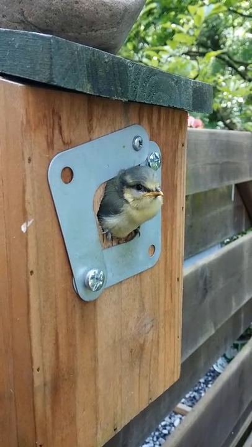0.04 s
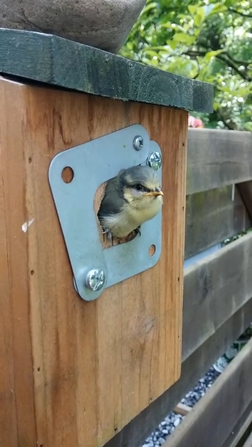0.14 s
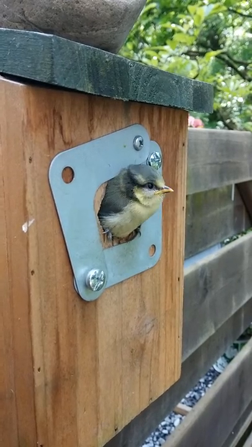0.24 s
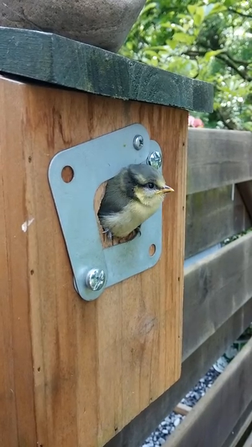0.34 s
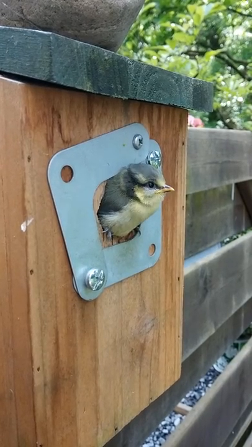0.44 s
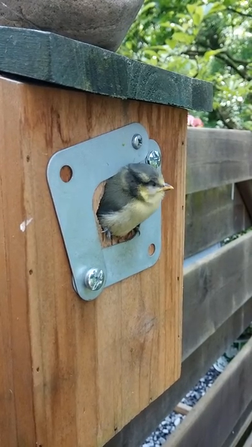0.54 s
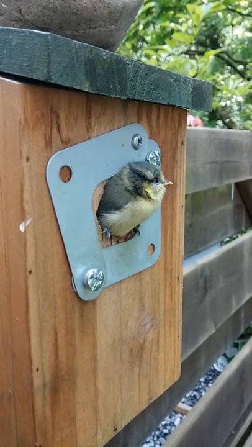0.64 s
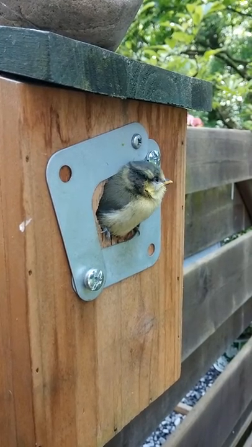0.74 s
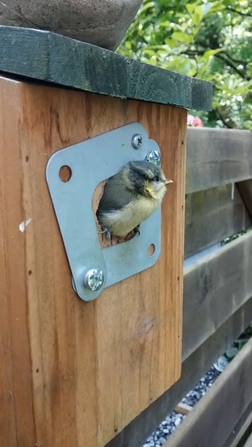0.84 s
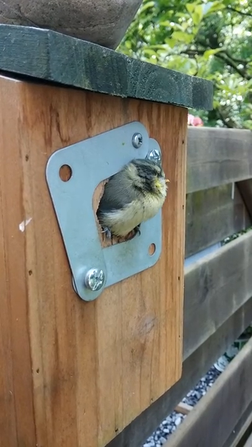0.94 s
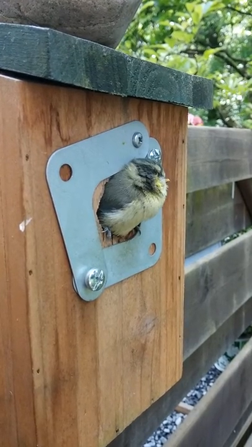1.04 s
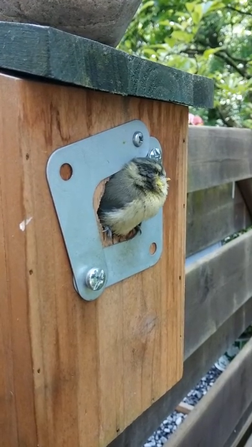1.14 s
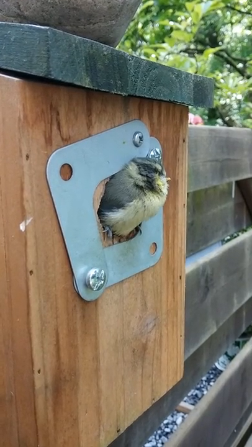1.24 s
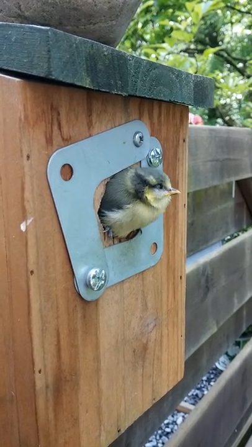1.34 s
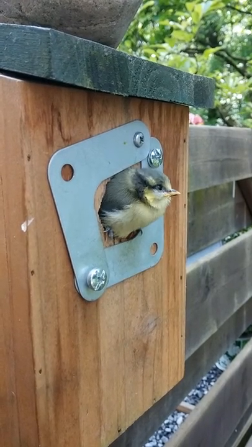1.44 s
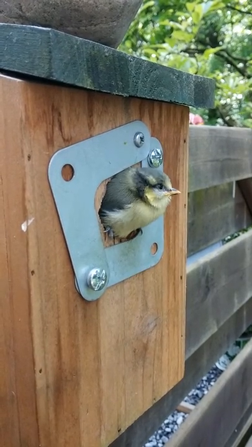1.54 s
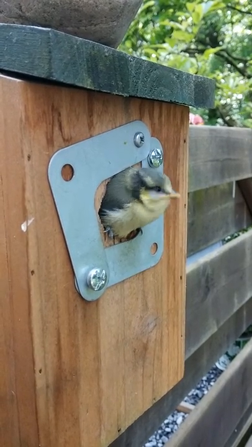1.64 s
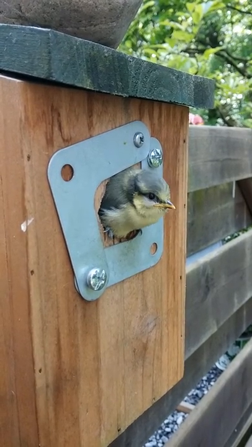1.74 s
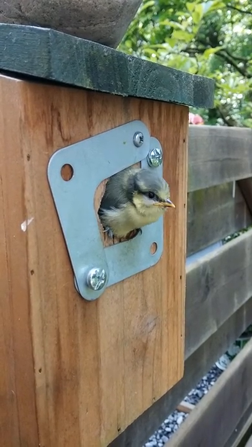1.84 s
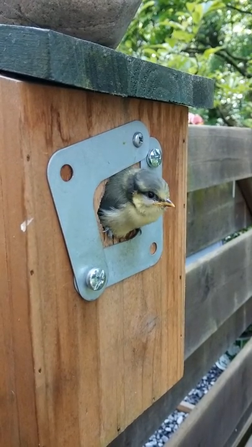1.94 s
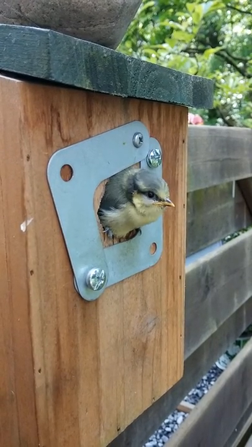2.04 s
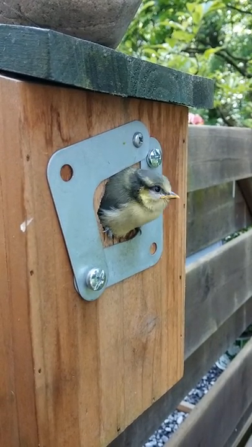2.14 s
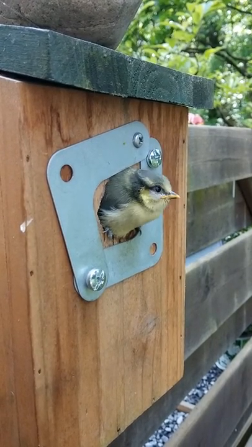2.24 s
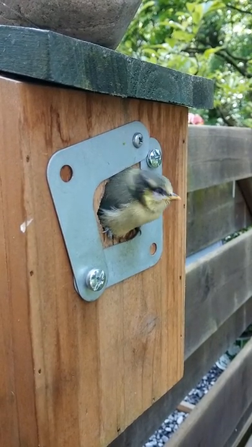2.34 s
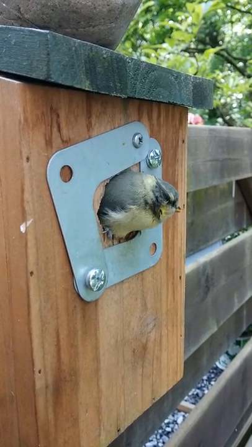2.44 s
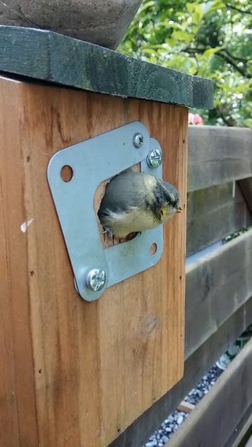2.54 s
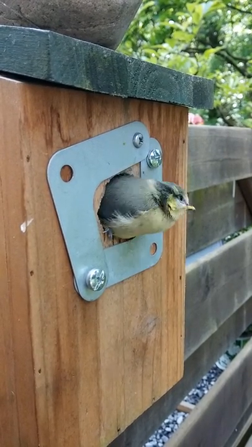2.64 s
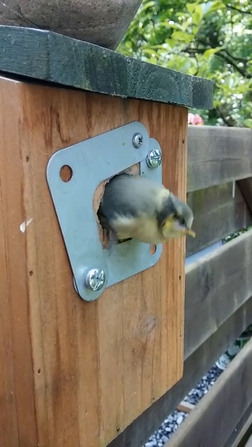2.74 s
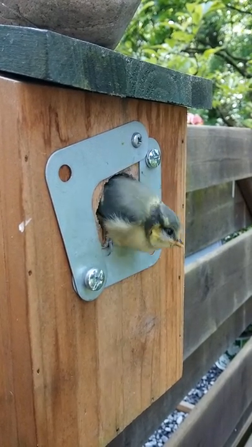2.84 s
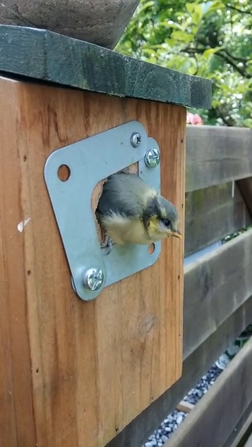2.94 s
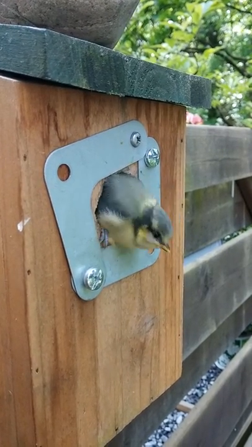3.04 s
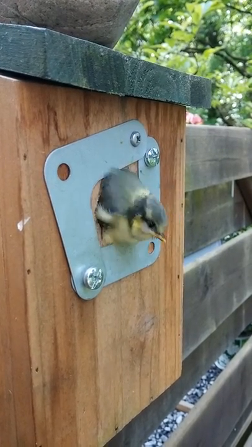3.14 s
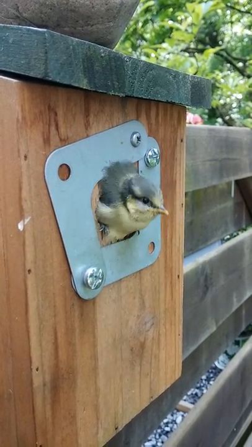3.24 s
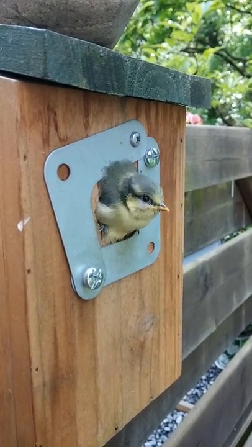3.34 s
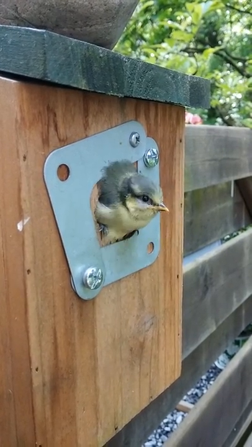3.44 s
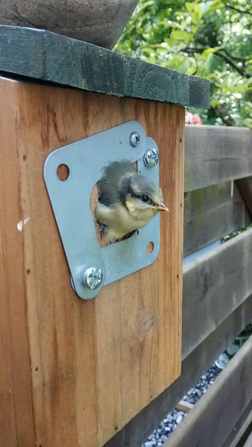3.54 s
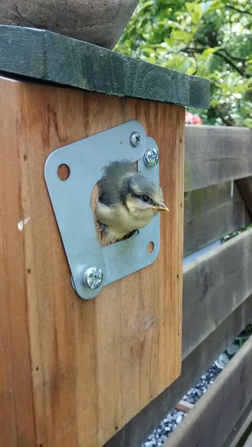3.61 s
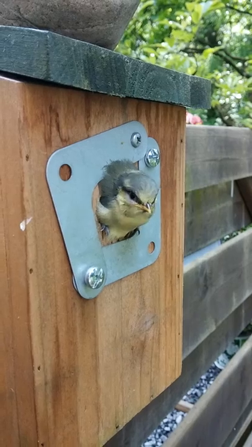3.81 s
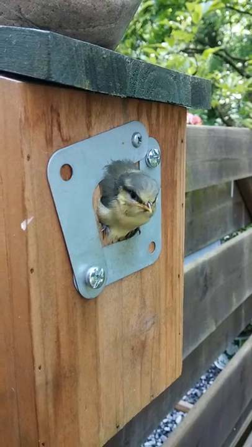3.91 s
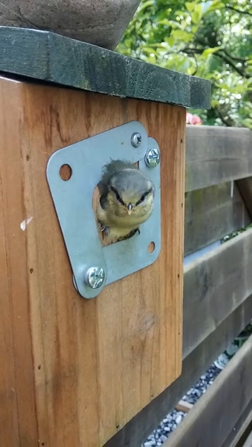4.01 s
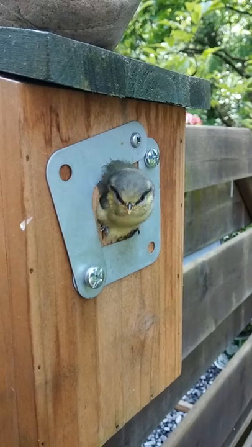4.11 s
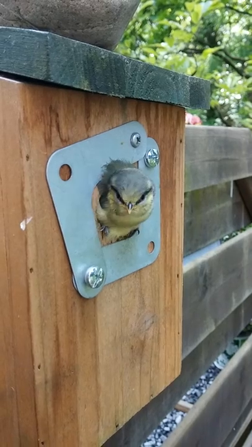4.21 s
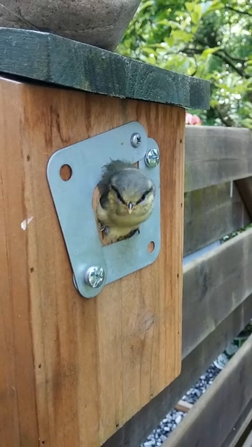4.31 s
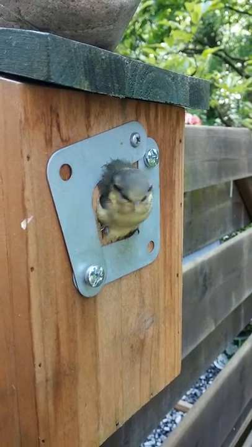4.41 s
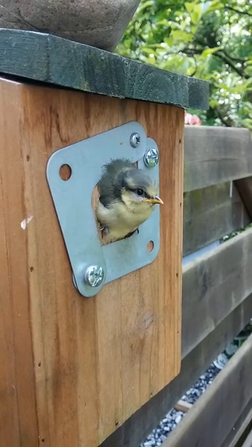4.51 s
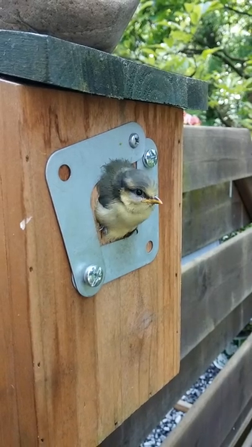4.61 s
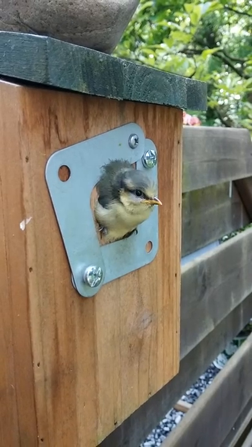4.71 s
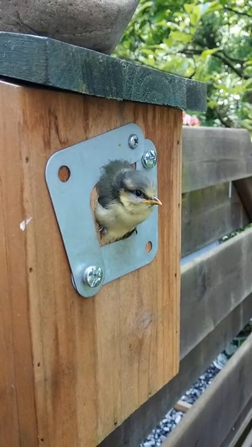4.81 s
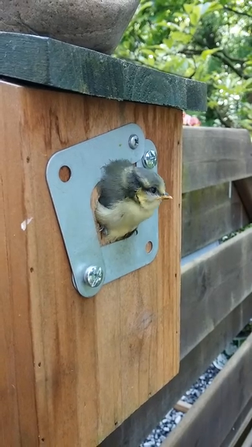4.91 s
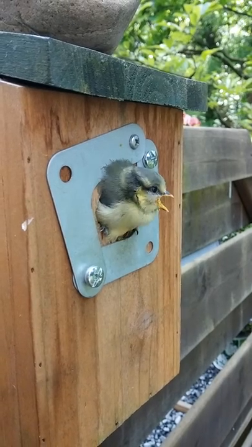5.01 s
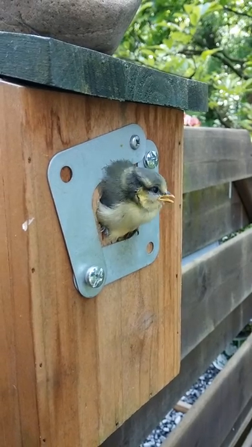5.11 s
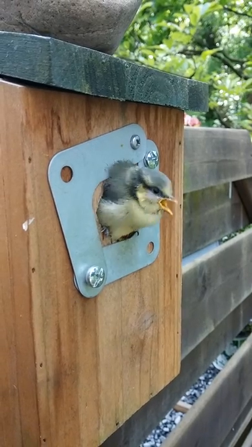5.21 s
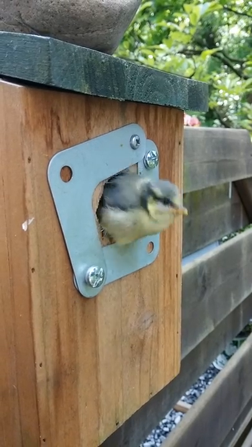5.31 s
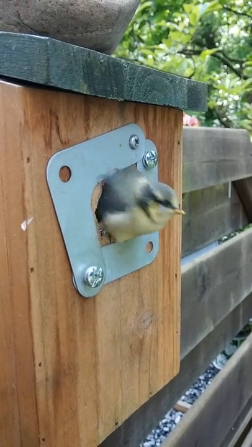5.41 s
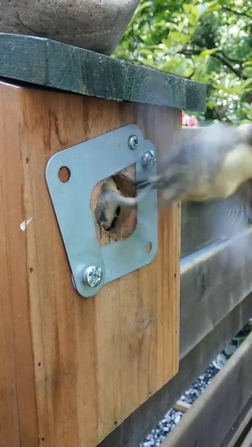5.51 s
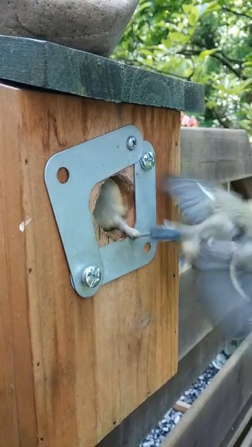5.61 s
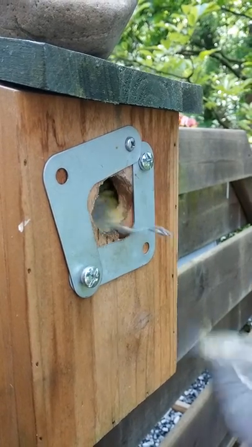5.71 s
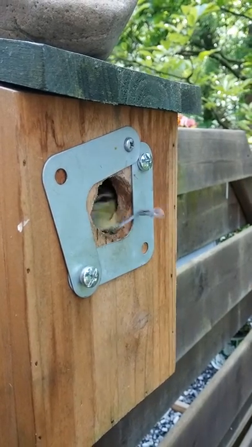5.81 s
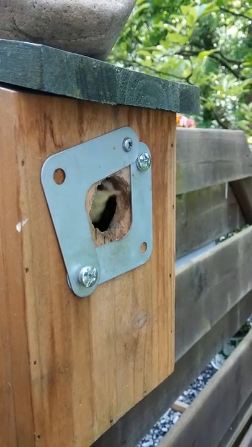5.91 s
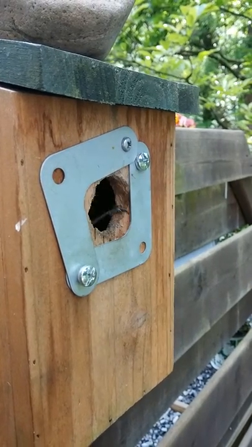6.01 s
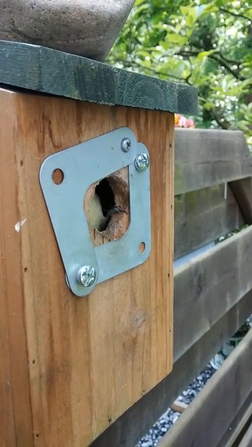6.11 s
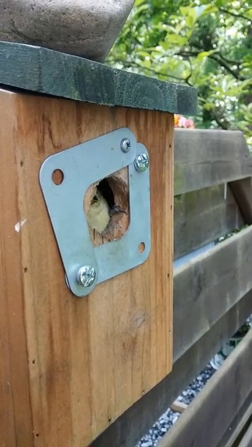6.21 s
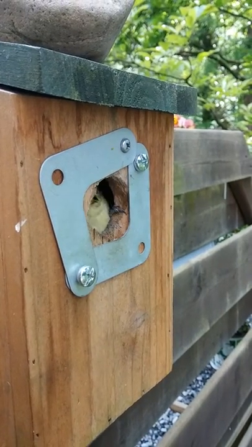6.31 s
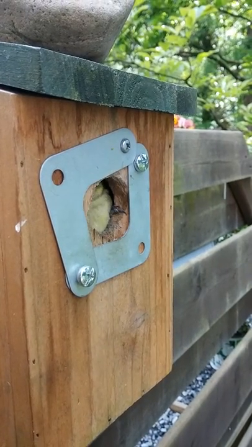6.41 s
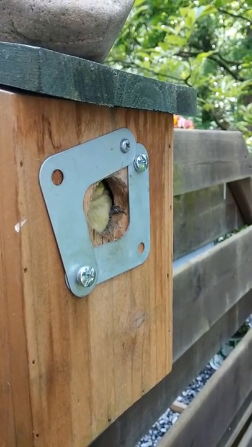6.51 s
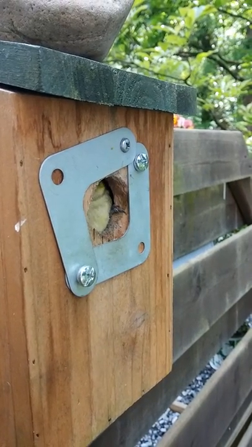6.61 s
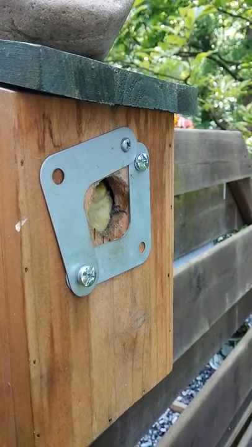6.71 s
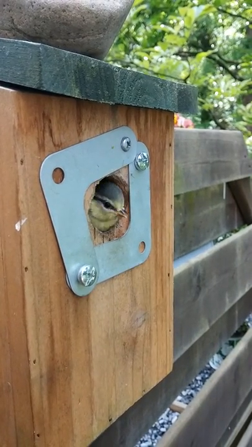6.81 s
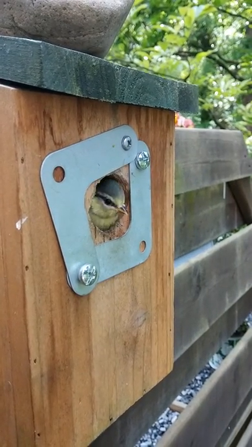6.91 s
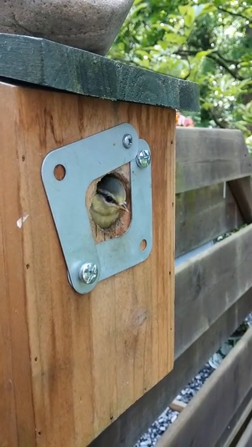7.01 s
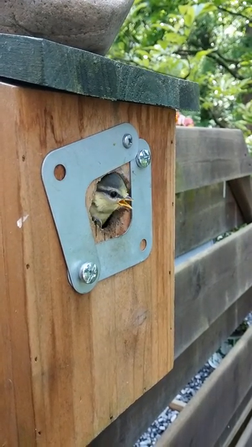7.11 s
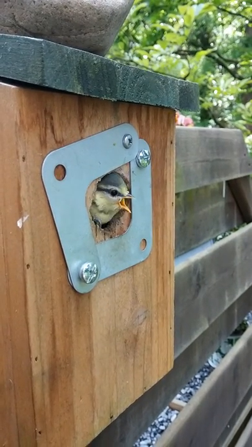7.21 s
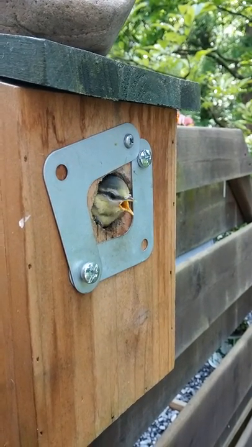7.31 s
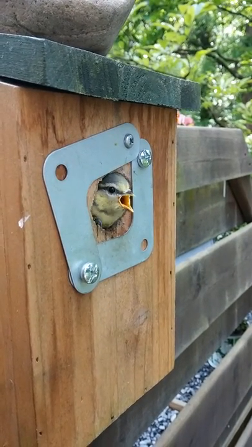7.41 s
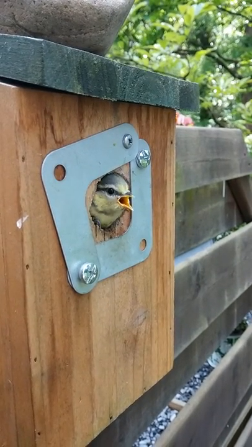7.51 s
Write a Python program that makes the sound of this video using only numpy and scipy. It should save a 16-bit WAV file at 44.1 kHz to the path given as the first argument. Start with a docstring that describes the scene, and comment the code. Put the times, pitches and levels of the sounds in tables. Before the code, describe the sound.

Soft thrush-like whistling over low traffic rumble, two shrill chick calls up close, a burst of flapping and scratching, then three more high calls.

```python
"""Young tits at a nest box

A young tit begs twice at the hole, its paired voices modulating each other, then scrambles out and flutters off.
Noise bursts make its wings, ticks and thumps its claws; a second bird takes its place and begs in three calls.
Other young and thrush-like whistles, gliding tones with echoes, ring over noise-made traffic rumble and air.
The background dips briefly, later drops out between calls; high notes carry a faint mirror image about 8 kHz."""
import sys
import numpy as np
from scipy import signal
from scipy.fft import rfft, irfft, next_fast_len
from scipy.io import wavfile
from scipy.ndimage import uniform_filter1d, minimum_filter1d, map_coordinates

SR = 44100
rng = np.random.default_rng(int(sys.argv[2]) if len(sys.argv) > 2 else 0)


def materialize(psi):
    """Save the field psi as 16-bit PCM at rate SR to the path in sys.argv[1].

    A 1-D psi becomes a single channel; in a 2-D psi each row is a channel.
    """
    bounded = np.clip(np.atleast_2d(psi).T, -1, 1)
    quanta = np.round(bounded * 32767).astype(np.int16)
    wavfile.write(sys.argv[1], SR, quanta)


N = 332955
T = np.arange(N) / SR
RIGHT = np.array([[0], [1]])  # picks the right channel


def amp(db):
    """Decibels to linear gain."""
    return 10 ** (np.asarray(db) / 20)


def unit(x):
    """Scale to an RMS of one."""
    return x / np.sqrt(np.mean(x ** 2) + 1e-20)


def along(points, hz):
    """Read (frequency, value) points on a log frequency axis."""
    f, v = np.transpose(points)
    return np.interp(np.log(hz + 1), np.log(f + 1), v)


def over_time(points):
    """Read (time, value) points as a curve over the scene."""
    return np.interp(T, *np.transpose(points))


def wobble(rate):
    """A smooth random curve, rate knots a second."""
    knots = rng.standard_normal(int(N * rate / SR) + 4)
    return map_coordinates(knots, [T * rate])


def filtered(x, response):
    """Shape the spectrum of x by a response of frequency."""
    m = next_fast_len(N + 8192)
    spectrum = rfft(x, m) * response(np.fft.rfftfreq(m, 1 / SR))
    return irfft(spectrum, m)[..., :N]


def noise(colour, alike):
    """Stereo noise: mid and side shares set how alike left and right are at each frequency."""
    def mid_side(hz):
        turn = np.arccos(np.clip(along(alike, hz), -1, 1)) / 2
        return amp(along(colour, hz)) * [np.cos(turn), np.sin(turn)]
    mid, side = filtered(rng.standard_normal((2, N)), mid_side)
    return unit(np.array([mid + side, mid - side]))


def stirred(x, rate, share):
    """Moving leaves and air blur a tone: part of it gets a random gain."""
    return x * (np.sqrt(1 - share) + np.sqrt(share) * unit(wobble(rate)))


def patchy(x, depth_db):
    """Random gain in patches of time and frequency."""
    z = signal.stft(x, nperseg=512)[2]
    field = uniform_filter1d(rng.standard_normal(z.shape[1:]), 5, 0)
    field = uniform_filter1d(field, 8, 1)
    return signal.istft(z * amp(depth_db * unit(field)), nperseg=512)[1][:, :N]


def note(rows, fade):
    """Sample span, edge fade and smoothed per-sample columns of one note."""
    s, *cols = np.transpose(rows)
    first = max(int((s[0] - fade) * SR), 0)
    span = slice(first, min(int((s[-1] + fade) * SR), N))
    t = T[span]
    edge = np.clip(np.minimum(t - s[0], s[-1] - t) / fade + 1, 0, 1) ** 2
    return span, edge, [uniform_filter1d(np.interp(t, s, c), size=257) for c in cols]


# Fences and trees: (frequency [Hz], time to fall 60 dB before each sound's own scale [s])
REFLECTIONS = [(2000, 0.55), (5000, 0.33), (9000, 0.35)]


def echoes(x, scale):
    """Scattered returns; each frequency dies at its own speed."""
    hz, t, z = signal.stft(rng.standard_normal((2, SR // 2)), SR, nperseg=256)
    decay = amp(-60 * t / (scale * along(REFLECTIONS, hz))[:, None])
    tail = signal.istft(z * decay, SR, nperseg=256)[1]
    delayed = np.pad(x, (300, 0))[None]
    return signal.fftconvolve(delayed, tail / np.linalg.norm(tail[0]), axes=1)[:, :N]


# Hiss of the microphone: (frequency [Hz], relative level [dB per Hz])
MIC_HISS = [(30, 8), (300, 0), (2000, -24.5), (9000, -20.5), (16000, -22.5)]


def self_noise():
    """A steady stereo noise floor from the microphone itself."""
    return amp(-71.5) * noise(MIC_HISS, [(100, 0.297)])


# Slow background course: (time [s], relative level [dB])
BACKGROUND_LEVEL = [(0, -53), (.6, -54.5), (1.2, -55), (1.9, -50.5), (2.35, -56.5), (2.8, -52.5),
                    (3.9, -54), (4.6, -52.5), (4.9, -54), (5.2, -53), (5.9, -49), (6.2, -59), (6.6, -55.5),
                    (7.55, -54.5)]
# Brief dips: (bottom from [s], bottom until [s], depth [dB], fall [s], return [s])
BACKGROUND_DIPS = [(0.275, 0.28, 10.5, 0.013, 0.12), (0.782, 0.801, 6.5, 0.074, 0.0106),
                   (1.083, 1.074, 10, 0.041, .04), (1.309, 1.311, 13, .02, 0.025),
                   (1.528, 1.542, 8.5, 0.028, 0.032), (2.092, 2.09, 3.5, 0.024, .03),
                   (2.299, 2.297, 23, .01, 0.02), (2.386, 2.374, 13, 0.039, 0.043),
                   (2.438, 2.45, 5.5, 0.024, 0.017), (3.002, 3.011, 7.5, 0.086, 0.036),
                   (3.326, 3.334, 4, 0.032, 0.11), (3.953, 3.968, 9, 0.042, 0.025),
                   (4.751, 4.758, 5, 0.12, .1), (4.935, 4.948, 9, .05, .02), (6.181, 6.179, 14, 0.015, .03),
                   (6.305, 6.331, 20.5, 0.043, 0.056), (6.387, 6.596, 24, .015, .008),
                   (6.72, 6.736, 21, 0.056, .015), (6.851, 6.916, 27, .024, 0.029),
                   (6.989, 7.046, 27.5, 0.055, 0.012), (7.102, 7.139, 20, 0.04, .02),
                   (7.342, 7.349, 12.5, 0.011, .06), (7.536, 7.534, 23, 0.022, .015)]


def background_db():
    """A slow level that wavers and dips."""
    dips = np.zeros(N)
    for bottom, until, depth_db, fall, back in BACKGROUND_DIPS:
        shape = np.minimum((T - bottom) / fall, (until - T) / back) + 1
        dips += depth_db * np.clip(shape, 0, 1)
    return over_time(BACKGROUND_LEVEL) + 1.5 * wobble(14) - dips


# Colour of traffic and air: (frequency [Hz], relative level [dB per Hz])
GARDEN_COLOUR = [(15, -48.5), (28, -22), (65, -0.5), (130, -3.5), (283, -14.5), (434, -19), (647, -18.5),
                 (800, -22.5), (980, -18.5), (1200, -26.5), (2000, -33.5), (4450, -45), (9500, -46.5),
                 (16000, -53)]
# Stereo width of the garden: (frequency [Hz], left-right likeness [0-1])
GARDEN_LIKENESS = [(60, 1), (200, 1), (450, 0.88), (1200, 0.15), (3400, 0.29), (9500, 0.037)]
# Bass against the rest of the background, before its random lumps: (time [s], level [dB])
RUMBLE_LEVEL = [(0, 4), (.7, 5.5), (2.7, 5), (3.1, 1), (4, 1), (5.5, -1), (6.4, -5.5), (7.55, -11)]
WHINE_HZ, WHINE_DB = 14600, -42  # thin hiss band, level against the background


def garden(level_db):
    """Traffic rumble in lumps, air hiss and a thin high band, all shaped noise."""
    air = unit(patchy(noise(GARDEN_COLOUR, GARDEN_LIKENESS), depth_db=2.5))
    air[1] = np.roll(air[1], 10)  # the right port lies farther from the road
    bass = filtered(air, lambda hz: 1 / (1 + (hz / 220) ** 4))
    lumps_db = over_time(RUMBLE_LEVEL) + 3 * wobble(7)
    whine_colour = [(WHINE_HZ - 400, -40), (WHINE_HZ, 0), (WHINE_HZ + 400, -40)]
    whine = noise(whine_colour, [(100, .3)])
    mix = air - bass + bass * amp(lumps_db) + amp(WHINE_DB) * whine
    return amp(level_db + 11.5) * mix * amp([[1.5], [-1.5]])


SCOOP_S = 0.0057  # time constant of the upward scoop into a begging note


def glides(notes, swell_db, scoop_hz):
    """Far notes: pitch slides from one value and settles on the other; the level swells in, then fades."""
    u = np.linspace(0, 1, num=15)
    tracks = []
    for s, length, from_hz, to_hz, db, fade_db, settle in notes:
        slide = np.expm1(-u * length / settle) / np.expm1(-length / settle)
        hz = from_hz + (to_hz - from_hz) * slide - scoop_hz * np.exp(-u * length / SCOOP_S)
        level_db = db - fade_db * u - swell_db * np.clip(1 - 8 * u, 0, 1)
        tracks.append(np.transpose([s + length * u, hz, level_db]))
    return tracks


def whistles(notes, upper_db, blur, wet_db, haze_db, pan_db, waver):
    """Gliding tones with an optional second voice 1.25 times higher; returns direct sound and echo feed."""
    dry, beat, drift = np.zeros(N), wobble(70), wobble(220)
    for rows in notes:
        span, edge, (hz, db) = note(rows, 0.006)
        phase = 2 * np.pi * np.cumsum(hz * (1 + waver * drift[span])) / SR
        voices = np.sin(phase) + amp(upper_db) * np.sin(1.25 * phase)
        dry[span] += np.sqrt(2) * edge * amp(db + 1.19 * beat[span]) * voices
    dry = stirred(dry, rate=300, share=blur)
    direct = np.array([dry * amp(pan_db), np.roll(dry, 10) * amp(-pan_db)])
    haze = stirred(dry, rate=1300, share=1.0)  # fluttering foliage spreads the tone widely
    return direct, amp(wet_db) * (stirred(dry, rate=120, share=0.8) + amp(haze_db) * haze)


# Thrush-like whistles: (start [s], length [s], from [Hz], to [Hz], relative level [dB],
# fade over the note [dB], pitch settling time [s])
SONG_NOTES = [ (.36, 0.081, 6270, 6150, -64, 9, .1), (.4, 0.059, 3980, 4050, -62, 9, 0.045),
              (.59, 0.055, 3350, 2875, -57.5, 5, .02), (.89, .11, 2584, 2760, -57.5, 11, 0.008),
              (.95, 0.064, 3700, 3570, -74, 0, .05), (1.085, 0.091, 4910, 4950, -65.5, 3, .05),
              (1.11, 0.058, 2906, 2246, -58, 6, 0.051), (1.42, .04, 2950, 2960, -58, 18, .05),
              (1.45, .22, 3620, 3670, -71, 15, 0.12), (1.68, 0.064, 3840, 4070, -70, 2, 0.088),
              (1.785, 0.076, 6480, 6280, -48, 11, .1), (1.8, 0.084, 7380, 6800, -53, 8, 0.18),
              (1.85, 0.05, 4300, 3920, -54, 4, 0.01), (1.92, .045, 2800, 2950, -59, -8, 0.038),
              (1.965, 0.097, 2970, 3524, -51.5, 10, 0.023), (2.55, 0.033, 3140, 3240, -50, 26, .05),
              (2.57, 0.049, 3785, 3760, -55, -15, 0.039), (2.61, 0.068, 3845, 3166, -38.5, 5, 0.052),
              (2.735, 0.036, 2850, 3037, -46, 1, 0.025), (2.81, 0.094, 2862, 2886, -40.5, 21, 0.076),
              (2.8, 0.073, 4930, 5620, -52, 0, 0.047), (2.87, .12, 4320, 4620, -55, 1, 0.044),
              (3.02, 0.035, 3670, 3200, -48.5, -12.5, .008), (3.05, 0.11, 3200, 3043, -36.5, 23, 0.016),
              (3.2, 0.088, 3015, 3386, -37, 22.5, 0.013), (3.27, 0.075, 5570, 5550, -71.5, 1, .1),
              (3.345, 0.025, 4310, 3300, -54.5, -14, .015), (3.4, 0.066, 3940, 3910, -41, 14, 0.047),
              (3.49, 0.065, 3860, 3634, -42.5, 13, 0.022), (3.555, 0.11, 2818, 2654, -43, 20, 0.038),
              (3.685, 0.15, 4560, 3303, -43, 5.5, .018), (3.825, 0.051, 2893, 2860, -38.5, 20, .05),
              (4.02, 0.093, 3377, 2750, -41.5, 18, 0.018), (4.04, 0.072, 2150, 1826, -56.5, 0.5, 0.071),
              (4.06, 0.065, 4620, 4560, -61, 8, .1), (4.145, 0.067, 2944, 2614, -40, 11, 0.092),
              (4.15, 0.12, 3445, 3530, -57.5, -2, 0.042), (4.255, 0.039, 4670, 4640, -54, 5, .05),
              (4.27, 0.028, 4320, 4000, -49.5, -1, .03), (4.305, 0.057, 3400, 3070, -39.5, 12, .03),
              (4.405, 0.14, 3850, 3620, -43.5, 15, 0.018), (4.5, 0.079, 3677, 2084, -42, 6, 0.024),
              (4.6, 0.065, 2030, 2460, -53.5, -7, 0.19), (4.6, 0.12, 3830, 3880, -62, -6, 0.11),
              (4.74, 0.094, 3283, 3345, -55, -7.5, 0.071), (5.0, 0.25, 3330, 3080, -53, -5.5, 0.12),
              (5.35, 0.16, 3720, 3570, -59.5, -5, 0.11), (5.83, .17, 2304, 1997, -59, 7, 0.101),
              (6.1, 0.082, 2250, 2150, -66.5, 1, .1), (6.19, 0.075, 2143, 2083, -54.5, 6, 0.09)]


def song():
    """Single gliding tones, lightly blurred by leaves."""
    tracks = glides(SONG_NOTES, swell_db=5, scoop_hz=0)
    return whistles(tracks, upper_db=-np.inf, blur=.3, wet_db=4, haze_db=-11, pan_db=5.0, waver=.004)


# Harsh churrs: (start [s], length [s], from [Hz], to [Hz], relative level [dB], fade over the note [dB])
CHURR_NOTES = [(0.422, 0.072, 3540, 3350, -60.5, 24), (1.103, 0.082, 4480, 4430, -62.5, 10),
               (1.13, .06, 2715, 2400, -58.5, 11), (1.76, .09, 5180, 5330, -69, 8),
               (1.842, 0.083, 4470, 4150, -56, 9), (2.305, 0.048, 5750, 6000, -65, 7),
               (2.8, 0.067, 5400, 6310, -55, 0), (3.37, 0.12, 3380, 3320, -50.5, 11),
               (3.71, 0.16, 4100, 3940, -59, -4.5), (4.274, .13, 4700, 3370, -55, -3),
               (4.47, .2, 5200, 5370, -71.5, 1), (4.6, 0.17, 4500, 4300, -62, 2.5)]
CHURR_SETTLE_S = 0.085


def churrs():
    """Strong random gain and pitch waver turn gliding tones into harsh buzzes."""
    notes = [(*row, CHURR_SETTLE_S) for row in CHURR_NOTES]
    tracks = glides(notes, swell_db=2.5, scoop_hz=0)
    return whistles(tracks, upper_db=-np.inf, blur=0.99, wet_db=-6.5, haze_db=13, pan_db=7.0, waver=0.039)


# Other young: (start [s], length [s], from [Hz], to [Hz], relative level [dB], fade over the note [dB])
OTHER_YOUNG = [ (0.0, 0.059, 7890, 7190, -60, 9), (.14, 0.093, 7660, 7080, -63, 0.5),
               (1.401, 0.093, 8540, 7880, -61, -0.5), (1.581, 0.092, 8130, 6800, -64, -8),
               (2.455, .09, 7950, 6800, -55.5, -7), (2.605, .095, 7890, 6150, -50, 1.5),
               (3.47, 0.075, 8400, 7420, -69, -7.5), (3.671, 0.11, 7700, 6880, -65, 3),
               (4.147, .115, 7690, 6614, -68.5, -11), (4.265, .028, 6900, 5280, -65.5, -1),
               (4.418, 0.067, 6280, 5660, -67, 4), (6.02, .1, 7320, 7100, -65, 9),
               (6.185, 0.083, 7920, 6700, -67.5, -1), (6.601, 0.04, 7530, 6880, -41, 11.5),
               (6.745, .08, 7450, 6600, -42.5, 15)]
BEG_SETTLE_S = 0.14


def other_young():
    """Begging farther away or inside the box: two voices scoop up, then glide."""
    notes = [(*row, BEG_SETTLE_S) for row in OTHER_YOUNG]
    tracks = glides(notes, swell_db=10.5, scoop_hz=453)
    return whistles(tracks, upper_db=-16, blur=0.19, wet_db=9, haze_db=-7, pan_db=10, waver=0.0036)


# Claws on wood and plate: (time [s], tick level before colouring [dB], tick pitch [Hz], thump level [dB])
CLAW_HITS = [(2.7462, -40.5, 3030, -51), (2.9396, -38.5, 3120, -51), (3.8166, -43, 3350, -51),
             (3.8372, -32.5, 2900, -46), (4.0817, -44, 2800, -44), (5.3304, -37.5, 7040, -36.5),
             (5.4144, -43, 3600, -46), (5.4328, -42.5, 3370, -29), (5.452, -34, 3730, -43.5),
             (5.474, -34, 3500, -48), (5.503, -33, 3760, -29), (5.5368, -27, 5370, -23.5),
             (5.5504, -33, 3540, -22.5), (5.5921, -31.5, 2620, -9.5), (5.6108, -25.5, 7700, -49),
             (5.6694, -21.5, 2280, -13), (5.7237, -39, 1680, -30), (5.763, -33.5, 2670, -48),
             (5.8103, -43, 2270, -33.5), (5.9167, -40, 7150, -51), (5.9485, -38, 3960, -49),
             (5.9628, -39.5, 1990, -40.5), (5.9979, -47, 1960, -42), (6.074, -44.5, 8830, -57),
             (7.0711, -48, 4640, -26)]


def claws():
    """Short ringing scratches on plate and wood, with thumps of the box at 170 and 620 Hz."""
    ticks, thumps, t = np.zeros(N + SR), np.zeros(N + SR), T[:SR // 10]
    for s, db, hz, thump_db in CLAW_HITS:
        scratch = 0.6 * np.sin(2 * np.pi * hz * t) + 0.76 * rng.standard_normal(len(t))
        scratch *= amp(-60 * t / 0.018)
        box = np.sin(2 * np.pi * 170 * t)
        box += 0.16 * amp(-60 * t / 0.011) * np.sin(2 * np.pi * 620 * t)
        ticks[round(s * SR):][:len(t)] += amp(db) * scratch
        thumps[round(s * SR):][:len(t)] += amp(thump_db - 60 * t / 0.03) * box
    tick_colour = [(800, 11), (2500, 8.5), (9000, 3.0), (13000, -18.5)]
    hits = np.append(filtered(ticks[:N], lambda hz: amp(along(tick_colour, hz))), np.zeros(10))
    hits += thumps[:N + 10]
    return np.array([hits[10:], 0.13 * hits[:N]])  # left leads and is louder


# Air stirred by the wings, before random swings: (time [s], relative level [dB])
STIRRED_AIR = [(5.3, -52), (5.42, -48.5), (5.52, -35.5), (5.64, -38), (5.72, -38.5), (5.9, -39.5),
               (5.95, -47), (6.05, -71)]
# Strong wing beats: (time [s], relative level [dB])
WING_BEATS = [(5.332, -40.5), (5.434, -40.5), (5.535, -37), (5.598, -25), (5.634, -33.5), (5.673, -21.5),
              (5.779, -28.5), (5.874, -37.5), (5.915, -29)]
# Colour of rustling feathers: (frequency [Hz], relative level [dB per Hz])
FEATHER_COLOUR = [(600, -31.5), (1000, -11.5), (3600, -8), (4700, -11), (9500, -24.5), (11000, -24.5),
                  (16000, -25.5)]
BEAT_S = 0.0058  # half width of a beat
AIR_REF_DB = -38  # air level at which flap and rustle are set
FLAP_DB, FLAP_FOLLOWS = -44.5, .3  # level, share of the air's swings in dB
RUSTLE_DB, RUSTLE_FOLLOWS = -42, .35
RUSTLE_DB_PER_S = -22  # rustle thins as the bird leaves
RUSTLE_FROM_S, IN_HOLE_DB = 5.45, 6  # feathers spread; quieter while still folded
FLAPS_FROM_S = 5.425  # the wings come free of the hole


def wings():
    """Wing beats push low air, flap in the low mids and rustle the feathers."""
    air = amp(np.interp(T, *np.transpose(STIRRED_AIR), -120, -120)) * unit(amp(3.1 * wobble(45)))
    for s, db in WING_BEATS:
        air += amp(db) * np.exp(-((T - s) / BEAT_S) ** 2)
    swing, flying = air / amp(AIR_REF_DB), air > amp(-100)
    push_colour = [(40, -18.0), (90, -0.5), (200, 0), (330, -10.5), (600, -44.5), (1500, -61.0)]
    push = amp(2) * air * noise(push_colour, [(100, 0.9)])
    flap_colour = [(200, -18.5), (350, 1.5), (650, 7.5), (1000, -4.5), (1800, -28)]
    flap_level = flying * (T > FLAPS_FROM_S) * amp(FLAP_DB) * swing ** FLAP_FOLLOWS
    flap = flap_level * noise(flap_colour, [(600, 0.28)])
    rustle_db = RUSTLE_DB - IN_HOLE_DB * (T < RUSTLE_FROM_S)
    rustle_db = rustle_db + RUSTLE_DB_PER_S * (T - STIRRED_AIR[0][0])
    rustle_level = flying * amp(rustle_db) * swing ** RUSTLE_FOLLOWS * unit(amp(2.5 * wobble(260)))
    rustle = rustle_level * patchy(noise(FEATHER_COLOUR, [(1000, 0.14)]), depth_db=4.0)
    return push + flap + rustle


# Breathy starts: (time [s], relative level [dB], length [s])
BREATHY_STARTS = [(4.946, -38, 0.021), (5.155, -21.5, 0.035), (7.144, -37, .04), (7.347, -27, 0.03),
                  (7.533, -18.5, 0.048)]
# Colour of the breathy starts: (frequency [Hz], relative level [dB per Hz])
BREATHY_COLOUR = [(1200, -50.5), (2000, -29.5), (2700, -18), (4800, -5), (6600, 2), (9500, -14.5),
                  (10300, -38.5), (12500, -30.5), (16000, -48.5)]


def breathy_starts():
    """Air escapes as noise before the membranes catch."""
    swell = np.zeros(N)
    for s, db, length in BREATHY_STARTS:
        swell += amp(db) * np.sin(np.pi * np.clip((T - s) / length, 0, 1) ** 1.52) ** 2
    hiss = noise(BREATHY_COLOUR, [(5000, 0.17)])
    return swell * amp(1 * wobble(210)) * hiss * amp([[2], [-2]])


# Calls at the hole, two by the first bird, three by the second; rows per call:
# (time [s], main voice [Hz], relative left level [dB], gap up to second voice [Hz])
CALLS = [
    [(4.958, 6450, -39.5, 1885), (4.97, 7894, -7, 1594), (4.98, 7610, -3.5, 1824), (5.02, 7540, -4, 1533),
     (5.05, 7345, -3.5, 1484), (5.072, 7230, -2.5, 1427), (5.082, 7020, -1.5, 1480),
     (5.089, 6720, -27, 1502)],
    [(5.176, 5880, -26, 1690), (5.182, 7010, -6, 1525), (5.193, 7526, -14, 1712), (5.21, 7050, -4, 1664),
     (5.25, 6840, -6, 1540), (5.265, 6616, -3.5, 1368), (5.274, 6474, -14.5, 1275)],
    [(7.165, 6870, -37.5, 1844), (7.175, 8120, -22, 2115), (7.195, 7540, -11.5, 1648),
     (7.218, 7440, -20, 1568), (7.24, 7270, -12, 1520), (7.28, 6964, -13, 1500), (7.293, 6530, -21, 1576)],
    [(7.37, 6830, -13.5, 2298), (7.377, 7260, -12.5, 2125), (7.41, 6960, -12, 1852),
     (7.435, 6736, -8.5, 1743), (7.46, 6656, -6.5, 1750), (7.47, 6500, -14.5, 1710)],
    [(7.54, 5580, -42, 1970), (7.549, 6770, -30.5, 2020)],
]
# Per call, before edge fades: (second voice level [dB], its swell over the call [dB],
# lower tone level [dB], its swell [dB])
PARTNER_LEVELS = [(-21, 3.5, -43.5, 3), (-28.5, 10, -41, -2.5), (-30, 18, -32.5, 1), (-37, 23, -37, 3.5),
                  (-52, -0.5, -50, 0)]
# How head and box aim each voice, per call: (main left-right [dB], left leads at 7 kHz [rad], extra lead [ms],
# second voice left-right [dB], its lead at 9 kHz [rad], lower tone left-right [dB], its lead [rad])
AIM = [(16, -4.5, 1.4, 8.5, -1, 20, -0.17), (13, 4, 0.87, 16, 10.5, 24.5, 0),
       (12, 0.9, 0.9, 1, 3.5, 25, -.6), (4, 2, 0.94, 6.5, 4.5, 17.5, -1.2), (-2, 4, .68, 4.5, 4, 12, -1.4)]
# Air round the voice: (frequency [Hz], relative level [dB per Hz])
BREATH_COLOUR = [(1200, -19.5), (3000, -20.5), (5000, -16.5), (7000, -2.5), (9300, -11), (10200, -33),
                 (12000, -37), (16000, -39)]
PARTNER_EDGE_S = 0.0085  # time constant as second voice and lower tone come and go


def chicks():
    """Both sides of the syrinx whistle and modulate each other, giving tones spaced by their gap."""
    out, effort = np.zeros((2, N)), np.zeros((2, N))
    shake, quiver = wobble(120), wobble(250)
    unsteady = stirred(np.ones(N), rate=190, share=0.23)  # the weak sum tones come and go
    for rows, partners, aim in zip(CALLS, PARTNER_LEVELS, AIM):
        pan_db, lead, delay_ms, upper_pan_db, upper_lead, lower_pan_db, lower_lead = aim
        span, edge, (hz, db, gap) = note(rows, .002)
        t, start, end = T[span], rows[0][0], rows[-1][0]
        u = (t - start) / (end - start)
        edge_db = -12 * (np.exp((start - t) / PARTNER_EDGE_S) + np.exp((t - end) / PARTNER_EDGE_S))
        upper_db = partners[0] + partners[1] * u + edge_db - db  # against the main voice
        lower_db = partners[2] + partners[3] * u + edge_db - db

        main = 2 * np.pi * np.cumsum(hz + 15 * quiver[span]) / SR
        step = 2 * np.pi * np.cumsum(gap + 20 * shake[span]) / SR
        main_lag = lead + 2 * np.pi * delay_ms / 1000 * (hz - 7000)
        upper_lag = upper_lead + 2 * np.pi * .00027 * (hz + gap - 9000)
        voice = amp(-pan_db * RIGHT) * np.sin(main - RIGHT * main_lag)
        voice += amp(upper_db - upper_pan_db * RIGHT) * np.sin(main + step - RIGHT * upper_lag)
        voice += amp(lower_db - lower_pan_db * RIGHT) * np.sin(main - step - RIGHT * lower_lead)

        strong_db = np.minimum(upper_db, -12)
        high = amp(strong_db - 24.5) * (hz + 2 * gap < 11200) * np.sin(main + 2 * step)
        high += amp(strong_db - 27) * np.sin(2 * main + step)
        high += amp(-49.0) * np.sin(2 * main) + amp(-70.0) * np.sin(2 * main - step)
        low = amp(np.minimum(lower_db, -15) - 16) * (np.sin(main - 2 * step) + np.sin(3 * step))
        low += amp(-48) * np.sin(step) + amp(-45.5) * np.sin(2 * step)  # the beat itself and its overtone
        voice += high * unsteady[span] * amp(-3 * RIGHT) + low * amp(-8 * RIGHT)

        level = edge * amp(db + 0.57 * shake[span])
        out[:, span] += np.sqrt(2) * level * voice
        effort[:, span] = level * amp(-pan_db * RIGHT / 2)
    out += amp(-31) * effort * noise(BREATH_COLOUR, [(5000, 0.37)])
    out += breathy_starts()
    spread = stirred(out[0], rate=300, share=1.0)
    spread += amp(-16) * stirred(out[0], rate=6000, share=0.96)
    return out, amp(-26.5) * echoes(spread, scale=0.61)


def scene():
    """Mix all sources; echoes fall away when the background sinks."""
    level_db = background_db()
    near, near_wet = chicks()
    young, young_far = other_young()
    tune, tune_far = song()
    churr, churr_far = churrs()
    wet = near_wet + echoes(young_far, scale=0.88)
    wet += echoes(tune_far + churr_far, scale=1.38) * amp([[1.5], [-1.5]])
    sink = amp(np.minimum(level_db + 52.0, 0))
    birds = near + young + tune + churr + sink * wet
    return birds + wings() + claws() + garden(level_db) + self_noise()


# Colour of the microphone: (frequency [Hz], gain [dB])
MIC_COLOUR = [(20, -5.5), (9500, 3), (10200, -0.5), (12000, -0.5), (15000, 3.5)]
MIRROR_HZ = 16000  # twice the frequency the image mirrors about
TOP_HZ = 15800  # band limit


def record(dry):
    """A faint mirror image about 8 kHz, the microphone's colour, a limiter at full scale, band limit."""
    band = filtered(dry, lambda hz: (hz > 6300) & (hz < 9700))
    mirrored = filtered(band * np.cos(2 * np.pi * MIRROR_HZ * T), lambda hz: hz < 10000)
    coloured = filtered(dry + amp(-27.5) * mirrored, lambda hz: amp(along(MIC_COLOUR, hz)))
    need = np.minimum(1, 1 / (np.abs(coloured).max(0) + 1e-9))
    gain = uniform_filter1d(minimum_filter1d(need, size=257), size=129)
    return filtered(coloured * gain, lambda hz: hz < TOP_HZ)


dry = scene()
out = record(dry)
materialize(out)
```